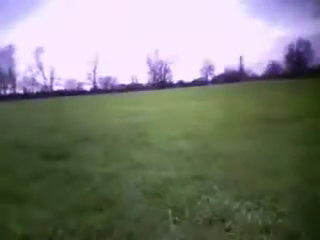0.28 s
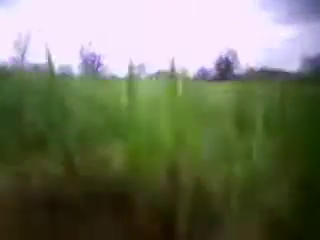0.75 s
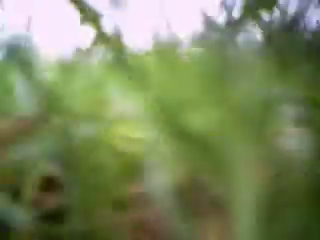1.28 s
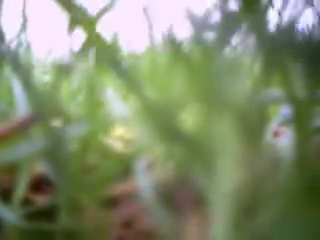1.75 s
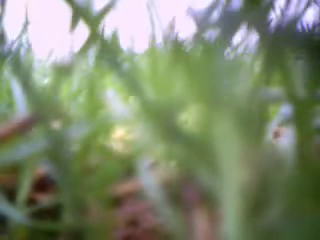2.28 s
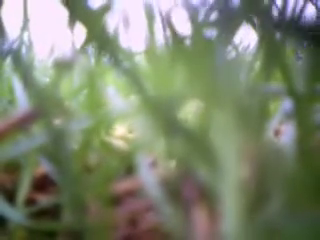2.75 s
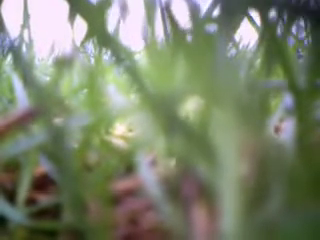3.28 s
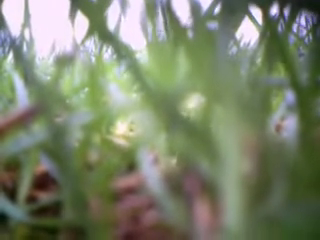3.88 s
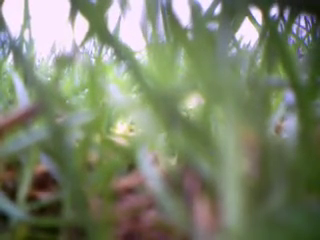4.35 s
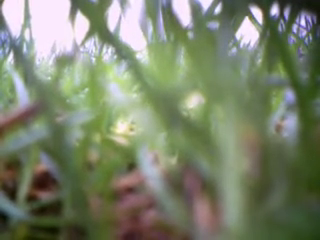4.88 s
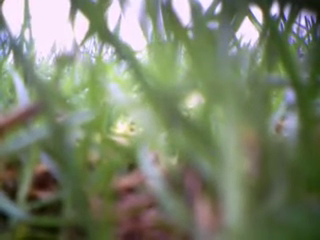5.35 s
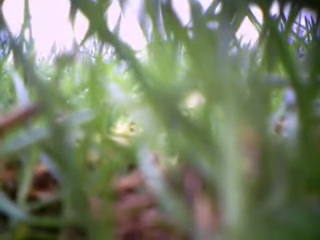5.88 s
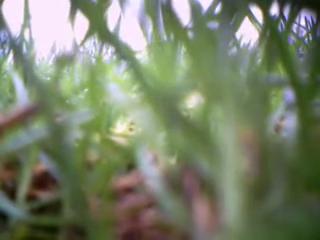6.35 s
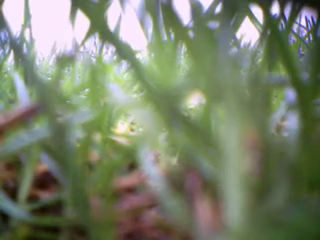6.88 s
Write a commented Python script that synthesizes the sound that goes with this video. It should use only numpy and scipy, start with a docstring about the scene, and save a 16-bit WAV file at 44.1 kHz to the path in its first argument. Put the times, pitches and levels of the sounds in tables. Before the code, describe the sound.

Right against the airframe of a small electric helicopter, a loud, clipped, piercing whine and dense plastic gear rattle sag slightly in pitch. Just after one second the motor cuts with a brief boom; whine crumbles into a falling, rough clatter that grows quieter and duller. Irregular knocks follow from five and a half seconds, thinning to a stop. Outdoors in grass, but only the machine is heard, through a cheap, overloaded, low-quality microphone with faint ticking noise.

```python
"""Small helicopter lands and stops

A tiny camera rides on a small electric helicopter that lands in grass and cuts its motor.
Random clacks ringing in the airframe make the gear rattle, and sines tied to the turning speed make the whine.
Filtered noise makes the air and the low shudder; short noise bursts are the last knocks as the shafts coast down.
The camera overloads, samples coarsely at a low rate and ticks faintly in the silence."""
import sys
import numpy as np
from scipy import signal
from scipy.fft import irfft
from scipy.io import wavfile
from scipy.ndimage import uniform_filter1d, map_coordinates

SR = 44100
rng = np.random.default_rng(int(sys.argv[2]) if len(sys.argv) > 2 else 0)


def transcribe(signal):
    """Save signal, clipped to [-1, 1], as a 16-bit WAV file at the path in sys.argv[1]."""
    frames = np.atleast_2d(signal).T
    limited = np.clip(frames, -1, 1)
    pcm = np.round(limited * 32767).astype(np.int16)
    wavfile.write(sys.argv[1], SR, pcm)


N = 313992

# Loudness of the gear rattle: (time [s], level [dB])
RATTLE_LEVEL = [(0, -14.5), (.45, -13), (1.25, -12.5), (2.3, -18), (2.7, -22), (3.4, -26), (4.0, -24.5),
                (4.4, -24), (5.2, -25), (5.85, -31), (6.25, -39), (6.3, -42.5), (6.45, -56.5)]
# Tones of the shafts, heard while they shake the airframe:
# (start [s], end [s], multiple of the turn rate, level at the start [dB])
SHAFT_TONES = [(-.2, 1.8, 1, -19), (1.8, 2.45, 1, -27), (3.0, 4.9, 1, -45), (1.5, 2.5, 2, -35),
               (2.98, 3.75, 2, -39), (.8, 1.5, 3, -29), (.8, 1.85, 4, -29), (3.2, 5.05, 4, -35),
               (-.2, .65, 5, -13), (.65, 1.48, 5, -16), (1.3, 1.7, 6, -21), (3.3, 5.5, 6, -48),
               (1.3, 1.8, 7, -24), (1.2, 1.9, 8, -28), (4.05, 5.0, 8, -45), (3.8, 4.3, 12, -43),
               (3.0, 3.8, 18, -36), (2.03, 2.55, 22, -21), (3.0, 3.3, 22, -33), (3.55, 4.5, 22, -36),
               (3.5, 4.0, 43.7, -28)]
# Tones of the motor: (start [s], end [s], multiple of the turn rate, level at the start [dB])
MOTOR_TONES = [(.3, 1.28, 27, -22), (-.2, 1.28, 28, -3.7), (1.28, 1.37, 28, -15), (1.55, 1.6, 28, -17),
               (1.7, 1.87, 28, -20), (1.87, 2.22, 28, -15), (2.22, 2.33, 28, -21), (4.2, 4.9, 28, -29),
               (.3, 1.28, 29, -25), (4.1, 4.5, 40, -37), (2.82, 3.3, 50, -23), (3.3, 3.65, 50, -30),
               (4.28, 4.58, 50, -31), (3.38, 3.9, 100, -26), (4.11, 4.48, 100, -29)]
# Slack teeth knock as the train slows:
# (time [s], level before ringing [dB], treble relative to that level [dB])
KNOCKS = [(5.43, -17, -26), (5.446, -10, -2), (5.582, -8.5, -11.5), (5.692, -15, -17), (5.768, -15, -13),
          (5.853, -21, -9), (5.983, -18, -10), (6.3, -28, -11), (6.335, -28, -7), (6.407, -18.5, -18),
          (6.434, -35.5, 6.5), (6.476, -28.5, 0), (6.51, -26, -16), (6.532, -32, 0.5), (6.585, -27.5, -10),
          (6.608, -23.5, -14), (6.664, -27, -10), (6.703, -26, -16), (6.767, -27.5, -13), (6.807, -20, -26),
          (6.84, -41, -3)]
# Smoothing of the camera's samples: (frequency [Hz], level [dB])
PLAYBACK_FILTER = [(3000, 0.5), (3500, -0.5), (4000, -7), (4400, -13.5), (4650, -21), (4800, -27),
                   (4950, -97)]
# Resonances of the airframe: (frequency [Hz], width [Hz], level [dB])
BODY = [(237, 140, -16.5), (444, 65, -4.5), (666.5, 143, 0.5), (1069, 180, 0.5)]
# Resonances of the canopy: (frequency [Hz], width [Hz], level [dB])
SHELL = [(1301, 310, -2), (1667, 394, -2.5), (2250, 437, -2), (2541, 284, -1.5)]
# Resonances of the gear case: (frequency [Hz], width [Hz], level [dB])
CASE = [(2860, 267, -5.5), (3452, 312, 0.5), (3990, 900, -8)]
# Speed under power, sagging at touchdown, until free coasting: (time [s], speed [turns per s])
POWERED_SPEED = [(0, 121.4), (.25, 121.2), (.6, 117.54), (.9, 115.65), (1.2, 114.71), (1.3, 113.49),
                 (1.4, 109.83), (1.8, 91.17)]

STOP_S = 6.9  # the rattle has sunk to its lowest level
COAST_S, FRICTION = 3.588, 37.26  # drag time constant [s], dry friction as a speed [turns per s]
FREE_S, OVERRUN = 3.62, 3.05  # from this time the shafts gain on the motor [turns per s, each second]
CUT_S, CUT_SWELL_DB, CUT_SWELL_S = 1.39, 4, .08  # the airframe booms as the power goes
LOOSE = 2.2  # unloaded gears waver this many times more in level
TONE_DB_PER_OCT = 8.5  # tones sink with speed
TREBLE_DB, TREBLE_KNEE, TREBLE_DB_PER_OCT = 3.5, 42.5, 4  # dulls below the knee [turns per s]
TOP_KNEE, TOP_DB_PER_OCT = 15, 5  # the highest airframe resonance dulls last [knee in turns per s]
GEARING = 5  # shaft turns per rotor turn
SNAG_AT_S, SNAG_MULTIPLE = .727, 22.4  # one pass of the tight spot [s], pitch as a multiple of the turn rate
SNAG_DB, SNAG_SHARE, SNAG_SCATTER_DB = -9, .1, 3  # level, length as a share of the rotor turn, scatter
AIR_DB, AIR_DB_PER_OCT, STILL_AIR_DB = -18.5, 9.5, -53  # at starting speed, drop with speed, constant part
STALL, STALL_DB = 50, 8.5  # below this speed [turns per s] the blade wash dies away
JERKY_S, JERKY_DB = 5.3, 7.5  # the shudder grows once the rotor turns in jerks
KNOCK_S, AFTER_S, AFTER_DB = 0.0062, 0.034, -12.5  # decay of the blow, decay and level of the chatter after
CAMERA_HZ, TICK_HZ = 8000, 313.3  # sampling rate, rate of the electronic ticks
STEP, BIAS = .006, -.11  # size of one sample step, constant offset
KNEE, TOP_HZ = 10.7, 12700  # sharpness of the second clip, upper limit of the sound [Hz]


def undb(db):
    """Turn decibels into a gain."""
    return 10 ** (np.asarray(db) / 20)


def unit(x):
    """Scale a sound to an average (rms) level of 1."""
    return x / np.sqrt(np.mean(x ** 2))


def ring(x, modes):
    """Add resonances with alternating sign, so that the valleys between them stay open."""
    out = 0
    for k, (hz, width, db) in enumerate(modes):
        b, a = signal.iirpeak(hz, hz / width, SR)
        out = out + (-1) ** k * undb(db) * signal.lfilter(b, a, x)
    return out


def walk(rate):
    """Wander at random: draw new values at the given rate [Hz] and smooth them twice."""
    k = int(SR / rate)
    held = np.repeat(rng.standard_normal(N // k + 1), k)
    return uniform_filter1d(uniform_filter1d(held, k), k)[:N]


def turns(t, overrun):
    """Speed and counted turns of a shaft: powered, then slowed by drag and dry friction."""
    s, speed = np.transpose(POWERED_SPEED)
    coast = (speed[-1] + FRICTION) * np.exp((s[-1] - t) / COAST_S) - FRICTION
    coast = coast + overrun * np.maximum(t - FREE_S, 0)
    rate = np.where(t < s[-1], np.interp(t, s, speed), np.maximum(coast, 1))
    rate = uniform_filter1d(rate, size=SR // 10)
    return rate, np.cumsum(rate) / SR


def rattle(rate, revs):
    """Teeth clack at random, sparser as the train slows, a little harder once per turn."""
    hits = rng.random(N) < (5000 + 90 * rate) / SR
    clacks = hits * rng.standard_normal(N) * undb(0.94 * rng.exponential(size=N))
    recent_level = np.sqrt(uniform_filter1d(clacks ** 2, size=SR // 4))
    surge_db = .5 * walk(14) + 0.69 * walk(90) + 0.37 * np.cos(2 * np.pi * revs)
    return clacks / recent_level * undb(surge_db)


def gears(t, rate, revs):
    """The clacks ring in airframe, canopy and gear case, duller at low speed."""
    clacks = rattle(rate, revs)
    rattle_db = np.interp(t, *np.transpose(RATTLE_LEVEL + [(STOP_S, -70)]))
    boom_db = CUT_SWELL_DB * np.exp(-((t - CUT_S) / CUT_SWELL_S) ** 2)
    top_db = TOP_DB_PER_OCT * np.minimum(np.log2(rate / TOP_KNEE), 0)
    body = unit(ring(clacks, BODY[:-1]) - undb(top_db) * ring(clacks, BODY[-1:]))
    # the stiff gear case needs fast blows, so it fades first
    case_db = -11.0 * np.clip(1 - rate / 45, 0, 1)
    treble = undb(-1.0) * unit(ring(clacks, SHELL)) + undb(case_db) * unit(ring(clacks, CASE))
    treble_db = TREBLE_DB + TREBLE_DB_PER_OCT * np.minimum(np.log2(rate / TREBLE_KNEE), 0)
    return undb(rattle_db) * (undb(boom_db) * body + undb(treble_db) * treble)


def tones(table, rate, revs, t, waver_db, wobble):
    """Sines locked to a shaft, each fading in and out; loose bearings blur level and phase."""
    out = np.zeros(N)
    waver_db = waver_db * np.where(t > CUT_S, LOOSE, 1)
    for start, end, multiple, db in table:
        fade = np.clip(np.minimum(t - start, end - t) / .03 + .5, 0, 1)
        speed_db = TONE_DB_PER_OCT * np.log2(rate / np.interp(start, t, rate))
        level = undb(db + speed_db + waver_db * walk(30))
        phase = 2 * np.pi * multiple * revs + wobble * walk(60)
        out += np.sqrt(2) * fade * level * np.sin(phase)
    return out


def snag(revs, t):
    """Under load a tight spot in the big gear chirps once per rotor turn."""
    rotor_turn = (revs - np.interp(SNAG_AT_S, t, revs)) / GEARING
    puff = np.exp(-((rotor_turn - np.round(rotor_turn)) / SNAG_SHARE) ** 2) * (t < CUT_S)
    level = undb(SNAG_DB + SNAG_SCATTER_DB * walk(25))
    return level * puff * np.sin(2 * np.pi * SNAG_MULTIPLE * revs)


def air(rate):
    """Blade wash and slow shaking buffet the microphone: low noise that weakens with speed."""
    noise = ring(rng.standard_normal(N), [(41.4, 90, -4.5), (162, 270, -2)])
    stall_db = STALL_DB * np.clip((STALL - rate) / 6, 0, 1)
    wash = undb(AIR_DB + AIR_DB_PER_OCT * np.log2(rate / rate[0]) - stall_db)
    return (wash + undb(STILL_AIR_DB)) * unit(noise * undb(2.5 * walk(10)))


def shudder(t):
    """The skids shudder low for as long as the rotor turns: noise in two low resonances."""
    turning = np.clip((STOP_S - .03 - t) / .02, 0, 1)
    growth_db = JERKY_DB * np.clip((t - JERKY_S) / .5, 0, 1)
    noise = unit(ring(rng.standard_normal(N), [(89, 39, -1.0), (192, 130, -7)]))
    return turning * undb(-52.5 + growth_db + 3.3 * walk(14)) * noise


def knocks(t):
    """Each knock is a sharp noise burst that dies away in airframe, canopy and gear case."""
    low, high = np.zeros((2, N))
    for s, db, treble_db in KNOCKS:
        since = np.maximum(t - s, 0)
        decay = np.exp(-since / KNOCK_S) + undb(AFTER_DB) * np.exp(-since / AFTER_S)
        blow = undb(db) * (t >= s) * decay
        low += blow
        high += blow * undb(treble_db)
    noise = rng.standard_normal(N)
    dull = undb(5.5) * ring(low * noise, BODY[:-1])
    bright = undb(4.5) * ring(high * noise, BODY[-1:] + SHELL + CASE)
    return dull + bright


def scene():
    """Add up everything that reaches the microphone through the airframe."""
    t = np.arange(N) / SR
    rate, revs = turns(t, OVERRUN)
    motor_rate, motor_revs = turns(t, 0)
    whine = tones(SHAFT_TONES, rate, revs, t, waver_db=1.2, wobble=.15)
    whine += tones(MOTOR_TONES, motor_rate, motor_revs, t, waver_db=1.5, wobble=.3)
    mix = gears(t, rate, revs) + whine + snag(revs, t) + air(rate) + shudder(t) + knocks(t)
    return mix[None]


def record(dry):
    """Overloading input, coarse slow sampling, smoothing that lets mirror tones through, a second clip."""
    count = round(N * CAMERA_HZ / SR)
    felt = signal.sosfilt(signal.butter(4, 5500, fs=SR, output="sos"), dry[0])
    headroom = np.where(felt > 0, .62, .56)  # upward, downward
    felt = headroom * np.tanh((np.abs(felt) / headroom) ** 2.694) ** (1 / 2.482) * np.sign(felt)
    samples = map_coordinates(felt, [np.arange(count) * N / count], order=3)

    # the electronics jolt the converter at a steady rate, on top of a little constant noise
    jolt = np.diff(np.floor(np.arange(count + 1) * TICK_HZ / CAMERA_HZ))
    noise_steps = 0.19 + 0.79 * jolt + 2.7 * np.roll(jolt, shift=1)
    noise = noise_steps * np.clip(rng.standard_normal(count), -2.5, 1.8)
    samples = STEP * np.round(samples / STEP + noise)

    # repeating the spectrum makes the mirror tones, which the smoothing then weakens
    bins = np.arange(N // 2 + 1)
    hz, db = np.array(PLAYBACK_FILTER).T
    smooth_db = np.interp(np.log(bins * SR / N + 1), np.log(hz), db, right=-200)
    spectrum = np.fft.fft(samples)[bins % count] * undb(smooth_db)
    played = irfft(spectrum, N) * N / count + BIAS

    ceiling = np.where(played > 0, .74, .71)
    clipped = played / (1 + np.abs(played / ceiling) ** KNEE) ** (1 / KNEE)
    softened = signal.lfilter(*signal.butter(4, 12000, fs=SR), clipped)
    return signal.sosfilt(signal.ellip(10, .2, 80, TOP_HZ, fs=SR, output="sos"), softened)[None]


dry = scene()
out = record(dry)
transcribe(out)
```